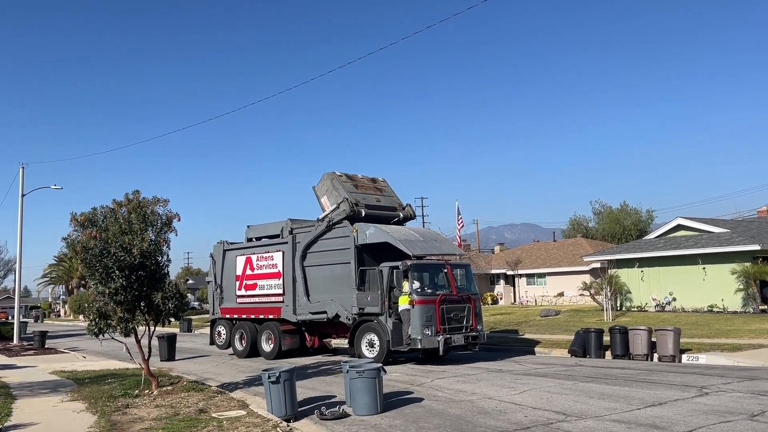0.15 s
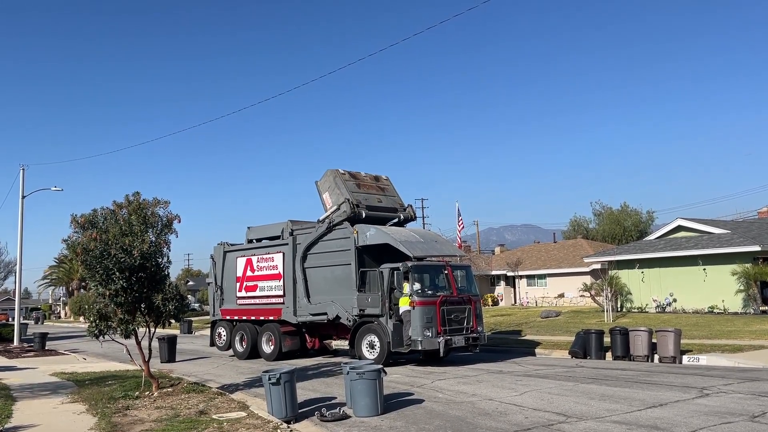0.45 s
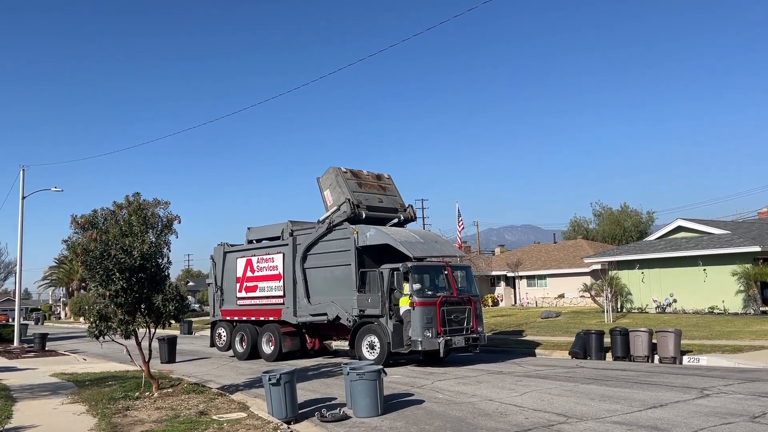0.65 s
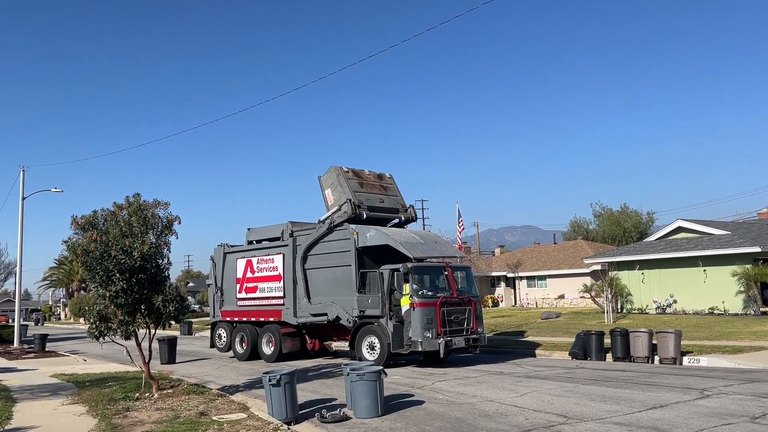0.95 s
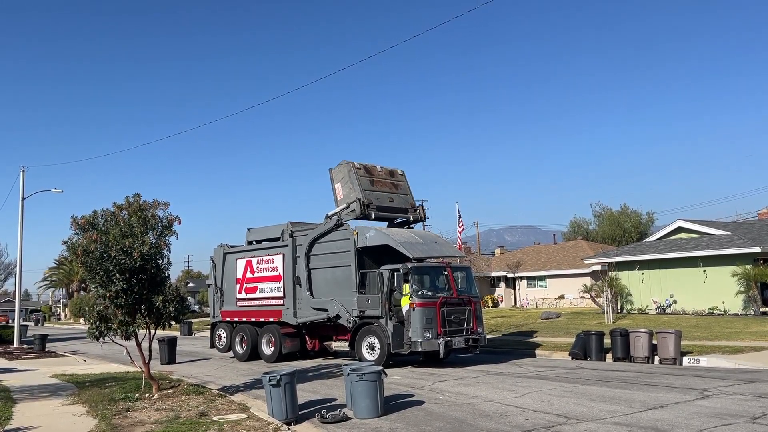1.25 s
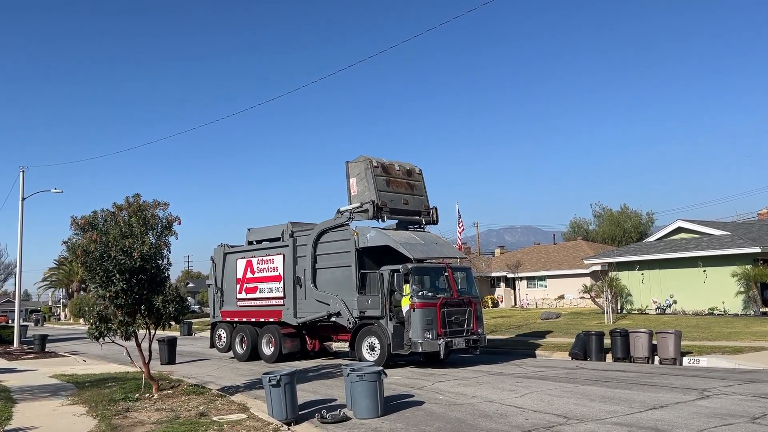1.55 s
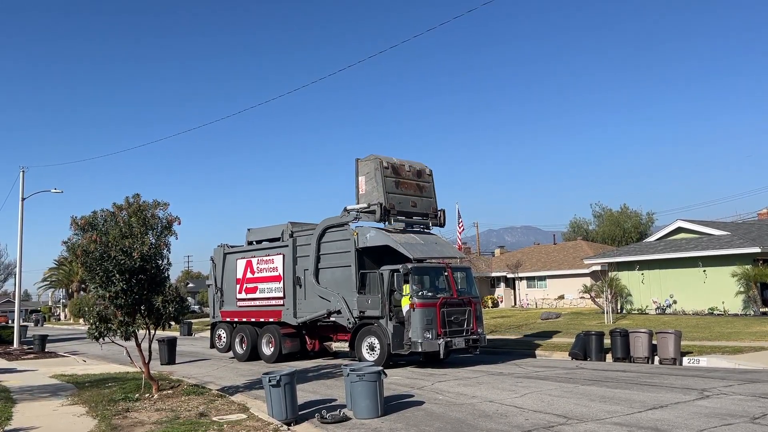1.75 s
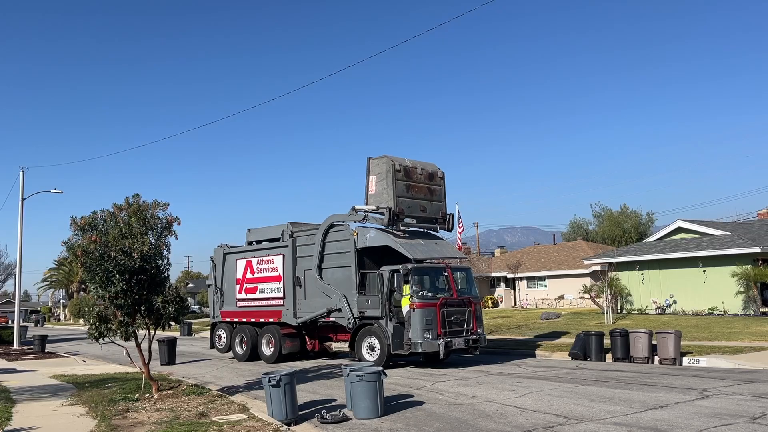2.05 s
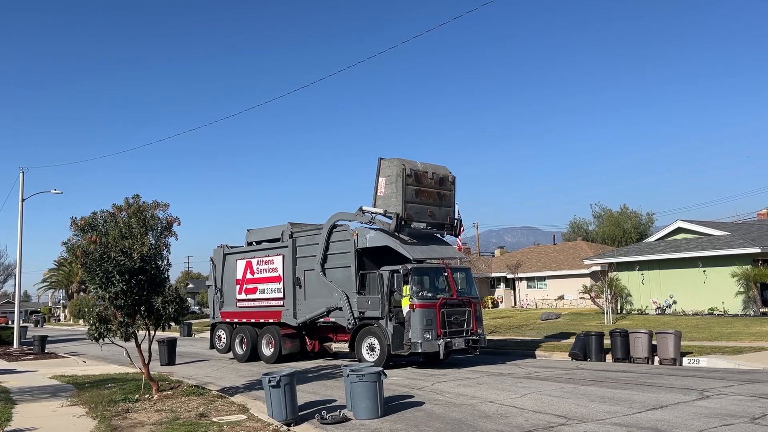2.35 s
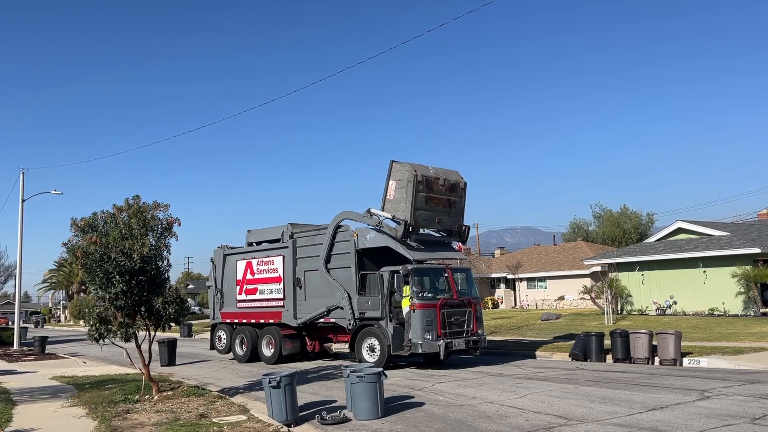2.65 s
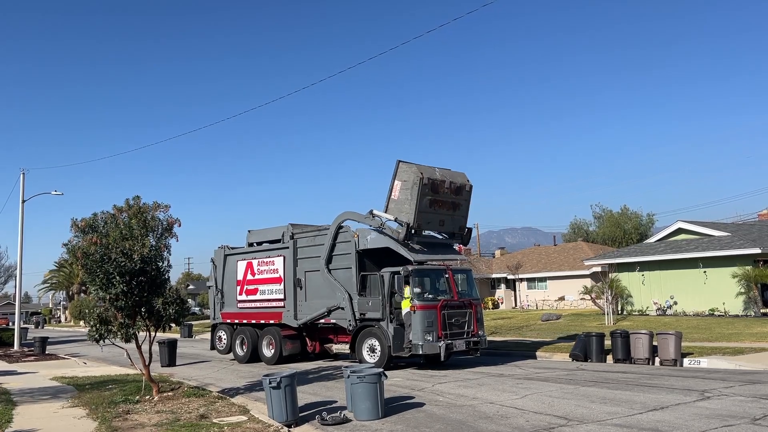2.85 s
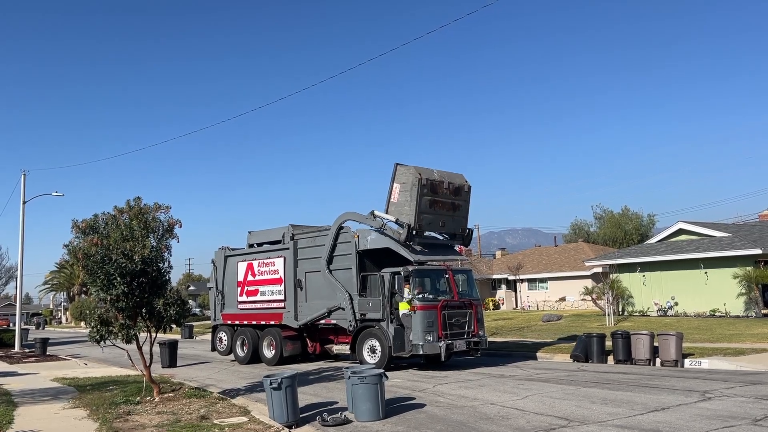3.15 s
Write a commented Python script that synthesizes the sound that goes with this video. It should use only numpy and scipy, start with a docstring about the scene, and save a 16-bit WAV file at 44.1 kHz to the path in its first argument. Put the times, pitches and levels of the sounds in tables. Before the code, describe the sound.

A garbage truck's diesel engine revs with hydraulic whine, then a steel bin bangs loudly.

```python
"""Refuse truck tipping a bin

Across a street, a six-cylinder diesel revs to swing a steel bin over the cab. The exhaust drones, block
and fan roar, gears and hydraulic pump whine with the engine speed, and oil hisses in the valves.
The arms click, the bin rocks, then it slams about on the forks in booming, ringing sheet-steel blows."""
import sys
import numpy as np
from scipy import signal
from scipy.fft import rfft, irfft
from scipy.io import wavfile

SR = 44100
rng = np.random.default_rng(int(sys.argv[2]) if len(sys.argv) > 2 else 0)


def wrap_up_sound(samples):
    """Save the sound to the file named by the first command line argument, as 16-bit audio."""
    columns = np.atleast_2d(samples).T
    # keep every value between -1 and 1, then stretch to whole-number steps
    tamed = np.clip(columns, -1, 1)
    steps = np.round(tamed * 32767).astype(np.int16)
    wavfile.write(sys.argv[1], SR, steps)


N = 145530
T = np.arange(N) / SR
CYLINDERS = 6


def amp(db):
    """Decibels to gain."""
    return 10 ** (np.asarray(db) / 20)


def unit(x):
    """Scales to rms 1."""
    return x / np.sqrt(np.mean(x ** 2) + 1e-20)


def curve(points):
    """Draws an automation curve through the scene."""
    return np.interp(T, *np.transpose(points))


def at_hz(points, hz):
    """Reads a table over log frequency."""
    f, value = np.transpose(points)
    return np.interp(np.log(hz + 1), np.log(f + 1), value)


def equalise(x, eq):
    """Filters by an EQ curve in dB."""
    size = x.shape[-1]
    return irfft(rfft(x) * amp(at_hz(eq, np.fft.rfftfreq(size, 1 / SR))), size)


def wander(hz):
    """Random drift of rms 1, rolling off above the given rate."""
    rolloff = 1 + (np.fft.rfftfreq(N, 1 / SR) / hz) ** 4
    return unit(irfft(rfft(rng.standard_normal(N)) / rolloff, N))


def add(mix, start_s, sound):
    """Drops a sound into the mix."""
    part = mix[:, round(start_s * SR):][:, :sound.shape[-1]]
    part += sound[..., :part.shape[-1]]


def decay(t, t60):
    """A tail that falls 60 dB in t60 seconds."""
    return np.exp(-np.log(1000) * t / t60)


def attack(rise_s):
    """A linear fade-in for a one-second hit."""
    return np.minimum(T[:SR] / rise_s, 1)


# Stereo width of the noise. Each row: frequency in Hz, left-right correlation.
LIKENESS = [(100, .9996), (200, .99), (350, .94), (650, .76), (1200, .85), (3000, .8), (8000, .9)]

def noise(size, eq, pulse=1):
    """Coloured noise of rms 1, partly alike at the two microphones."""
    a, b = rfft(rng.standard_normal((2, size)))
    likeness = at_hz(LIKENESS, np.fft.rfftfreq(size, 1 / SR))
    mid, side = a * np.sqrt(1 + likeness), b * np.sqrt(1 - likeness)
    white = irfft(np.array([mid + side, mid - side]), size)
    return unit(equalise(white * pulse, eq))


def burst(eq, t60, rise_s):
    """A knock that dies evenly at all pitches."""
    return noise(SR, eq) * decay(T[:SR], t60) * attack(rise_s)


# Faders for the exhaust's drone and lope. Each row: time in seconds, level in dB.
DRONE_FADER = [(0, -28.5), (.13, -20.5), (.22, -22), (.25, -33), (.34, -30.5), (.41, -21), (.45, -36),
               (.75, -52), (1.06, -31.5), (1.15, -29), (1.4, -24), (1.62, -18.5), (1.655, -39), (1.74, -29),
               (1.85, -23.5), (2.17, -20), (2.23, -29), (2.26, -19.5), (2.4, -24.5), (2.76, -21.5),
               (3.3, -29)]
LOPE_FADER = [(0, -25.5), (.38, -30), (.5, -29), (.9, -25.5), (1.05, -32), (1.2, -25), (1.6, -27.5),
              (1.7, -35), (2.15, -30), (2.25, -29.5), (2.35, -30), (3.3, -35)]
# The lope's partials. Each row: multiple of the six-firing cycle, relative level in dB.
LOPE_PARTIALS = [(3, 3.5), (4, 0), (5, 1), (7, -7), (8, -6.5), (9, -4), (10, -7), (12, -9.5), (14, -10),
                 (16, -14.5), (18, -11)]

def exhaust(firings):
    """A drone at the firing rate, with unequal cylinders loping around it."""
    cycle = 2 * np.pi * firings / CYLINDERS
    lope = sum(amp(db) * np.cos(order * cycle + 1.45 * wander(hz=7.6)) for order, db in LOPE_PARTIALS)
    drone = np.sqrt(2) * np.sin(2 * np.pi * firings)
    return amp(curve(DRONE_FADER)) * drone + amp(curve(LOPE_FADER)) * unit(lope)


# Fader for block and fan. Each row: time in seconds, level in dB.
ROAR_FADER = [(0, -36.5), (.24, -31.5), (.55, -33), (.76, -27.5), (.95, -28.5), (1.13, -31), (1.35, -33.5),
              (1.65, -36), (2.1, -34.5), (2.45, -37), (2.76, -34), (3.3, -29.5)]
# Their dark tone. Each row: frequency in Hz, relative level in dB.
ROAR_EQ = [(20, -13.5), (45, -2), (90, -6.5), (160, -0.5), (260, 1), (420, -3), (650, -4.5), (1000, -9.5),
           (1500, -10.5), (2100, -15), (2800, -20), (4500, -24), (6000, -34.5), (8000, -39), (10000, -56),
           (13000, -43), (15500, -70)]

def engine_roar(firings):
    """Block and fan noise, pulsed by a knock of random strength at every firing."""
    depth, length_firings, scatter_db = 0.15, 0.22, 6.5
    strength = amp(scatter_db * rng.standard_normal(N))[firings.astype(int)]
    knock = unit(strength * np.exp(-(firings % 1) / length_firings))
    return amp(curve(ROAR_FADER)) * noise(N, ROAR_EQ, pulse=1 - depth + depth * knock)


# Fader for the gears. Each row: time in seconds, level in dB.
WHINE_FADER = [(0, -41.5), (.17, -39.5), (.22, -46), (.4, -44), (.55, -40), (.63, -43), (.71, -35),
               (.76, -34.5), (.8, -43), (.86, -39.5), (.99, -44), (1.04, -33), (1.07, -37.5), (1.09, -50),
               (1.13, -47), (1.155, -34.5), (1.22, -37.5), (1.27, -48), (1.37, -40.5), (1.6, -41.5),
               (1.95, -40.5), (2.4, -43.5), (2.76, -39)]

def gear_whine(firings, firing_hz):
    """A rasping mesh tone that throbs and wobbles more as the engine lugs at low speed."""
    teeth_per_firing, lug_hz, throb_limit_db = 16, 87, 4.5
    cycle = 2 * np.pi * firings / CYLINDERS
    lug = (lug_hz / firing_hz) ** 5.4
    throb = lug * (-2 * np.sin(cycle) + 1.5 * np.sin(4 * cycle) + 4.5 * wander(hz=39))
    throb_db = throb_limit_db * np.tanh(throb / throb_limit_db)
    wobble = 0.68 * lug * wander(hz=53)
    mesh = np.sin(2 * np.pi * teeth_per_firing * firings + wobble)
    rasp = 1 + 0.45 * wander(hz=100)
    return amp(curve(WHINE_FADER)) * unit(amp(throb_db) * mesh * rasp)


# The pump's tones. Each row: multiple of the firing rate, level in dB before pipework and swell.
PUMP_TONES = [(7.68, -46.5), (23.7, -54), (31.1, -54), (38.5, -55.5), (39.8, -57.5)]
# The pipework favours some pitches. Each row: frequency in Hz, gain in dB.
PIPE_EQ = [(650, -6), (880, 5), (1750, -3.5), (1920, 3), (2200, -4), (2340, 4.5), (2430, 2), (2500, -7),
           (2850, -5), (2970, -1.5), (3100, -6), (3250, 3), (3380, -6), (3570, 1), (3750, -9), (4150, -6),
           (4420, 1)]

def hydraulic_pump(firings):
    """Fuzzy, flickering tones that track the engine's speed and swell with its roar."""
    fuzz_hz, flicker_db = 30, 1.5
    tones = 0
    for multiple, db in PUMP_TONES:
        phase = 2 * np.pi * multiple * firings
        fuzzy = wander(fuzz_hz) * np.cos(phase) + wander(fuzz_hz) * np.sin(phase)
        tones += amp(db) * unit(fuzzy * amp(flicker_db * wander(hz=4.2)))
    effort_db = curve(ROAR_FADER)
    swell = amp(0.3 * (effort_db - effort_db.mean()))
    return equalise(tones, PIPE_EQ) * swell


# Fader for the oil. Each row: time in seconds, level in dB.
HISS_FADER = [(0, -65.5), (.58, -61), (.72, -45.5), (.9, -74), (1.05, -55.5), (1.3, -69), (3.3, -65)]
# Its thin, bright tone. Each row: frequency in Hz, relative level in dB.
HISS_EQ = [(20, -64.5), (2000, -17.5), (4500, 6), (7500, -3), (10000, -13.5), (13000, -28), (15500, -23.5)]

def valve_hiss():
    """Oil rushing through the valves."""
    return amp(curve(HISS_FADER)) * noise(N, HISS_EQ)


# Cues for the arm joints. Each row: start in seconds, level in dB, t60 in seconds.
CLICK_CUES = [(0.147, -34.5, 0.04), (0.948, -30.5, 0.025), (0.961, -31.5, 0.05), (2.624, -35.5, 0.03),
              (2.760, -24, 0.07)]
# Their midrange snap. Each row: frequency in Hz, relative level in dB.
CLICK_EQ = [(20, -38), (400, 10.5), (1500, 7.5), (4500, 0.5), (8000, -9), (13000, -25), (15500, -24)]

def linkage_clicks():
    """Light clicks as the arm joints take up their slack."""
    out = np.zeros((2, N))
    for start, db, t60 in CLICK_CUES:
        add(out, start, amp(db) * burst(CLICK_EQ, t60, rise_s=0.0015))
    return out


# Cue for the rocking bin. Each row: start in seconds, level in dB.
CLUNK_CUES = [(1.113, -25.5)]
# Its hollow tone. Each row: frequency in Hz, relative level in dB.
CLUNK_EQ = [(20, -30), (300, -8), (600, 0), (760, 14), (950, 1), (1130, 4), (1450, -8), (2500, -30),
            (15500, -64)]

def bin_clunk():
    """A dull clunk as the bin rocks on the forks before it tips."""
    out = np.zeros((2, N))
    for start, db in CLUNK_CUES:
        add(out, start, amp(db) * burst(CLUNK_EQ, t60=0.16, rise_s=0.008))
    return out


def steel_ring(modes, rise_s):
    """Steel ringing after a blow; the high modes reach the two microphones out of step."""
    t, out = T[:SR], 0
    for hz, db, t60 in modes:
        spread = 0.35 * min(hz / 1000, 1) ** 2
        phase = 2 * np.pi * rng.random() + spread * rng.standard_normal((2, 1))
        out += amp(db) * decay(t, t60) * np.sin(2 * np.pi * hz * t + phase)
    return out * attack(rise_s)


def sheet_steel(eq, tails, rise_s):
    """Countless close modes of a struck panel, the lows outlasting the highs."""
    hz, t, spectrum = signal.stft(noise(SR, eq), SR, nperseg=512)
    _, wash = signal.istft(spectrum * decay(t, at_hz(tails, hz)[:, None]), SR)
    return wash[:, :SR] * attack(rise_s)


# The bin's ringing notes. Each row: frequency in Hz, relative level in dB, t60 in seconds.
BIN_MODES = [(104, 6.5, .6), (210, -9, .8), (236, -5, 1), (258, -8, .9), (304, -8, .8), (390, -6, .8),
             (419, -9, .9), (449, -10, .8), (606, -12, .7), (700, -11, .35), (732, -12, .7), (813, -9, .35),
             (860, -13, .7), (974, -8, .5), (1071, -5.5, .9), (1220, -15, .3), (1335, -13, .3),
             (1457, -12, .42), (1787, -13, .5)]

def bin_ring(pitch_hz, rise_s):
    """The place of a blow decides which modes ring most: those near pitch_hz are lifted."""
    lift_db, width_octaves = 12, 0.2
    modes = []
    for hz, db, t60 in BIN_MODES:
        nearness = np.exp(-(np.log2(hz / pitch_hz) / width_octaves) ** 2)
        modes.append((hz, db + lift_db * nearness, t60))
    return steel_ring(modes, rise_s)


# The forks' clank. Each row: frequency in Hz, relative level in dB, t60 in seconds.
FORK_MODES = [(1920, 1, .3), (2008, 0, .35), (2121, -1, .25), (2315, -2, .3), (2815, -7, .3),
              (3284, -7, .25), (3564, -3, .25), (3666, 1, .14), (4177, -4, .22), (5141, -6, .16)]
# Tone of each noise layer in a blow. Each row: frequency in Hz, relative level in dB.
CRACK_EQ = [(20, -28.5), (500, 14.5), (2000, 10), (3000, 3), (4400, 9.5), (6000, 0), (8000, -7),
            (10000, -30.5), (13000, -30), (15500, -31)]
CRASH_EQ = [(20, -40), (300, -10), (900, 4), (1400, -1), (2100, -4), (2900, -10.5), (4400, -15),
            (6000, -22), (8000, -24), (10000, -57), (13000, -43), (15500, -47)]
BOOM_EQ = [(20, -34), (70, -12), (160, -6), (280, -4.5), (430, -1), (570, -14), (950, -11), (1300, -24),
           (2500, -43), (15500, -85)]
THUD_EQ = [(20, -23), (38, -3), (58, -1), (105, 0), (150, -8), (300, -40), (15500, -100)]
# Tails of the sheet steel. Each row: frequency in Hz, t60 in seconds.
CRASH_TAILS = [(300, 0.88), (1000, 0.23), (2200, 0.18), (5000, 0.24), (13000, 0.17)]
BOOM_TAILS = [(100, 0.8), (300, 0.85), (1000, 0.6), (3000, 0.16)]
# Cues for the blows. Each row: start in seconds, crack level in dB, its tilt above 1 kHz in dB per
# octave, levels of clank, crash, boom, thud and ring in dB, favoured ring pitch in Hz.
BLOW_CUES = [(2.779, -13.5, 5.5, -28.5, -17.5, -19, -13, -22.5, 970),
             (2.801, -25.5, 7, -40, -16.5, -18.5, -12.5, -26.5, 420),
             (2.820, -31, -7, -36, -26, -22.5, -19, -29.5, 1400),
             (2.838, -28.5, 6.5, -40, -23.5, -19.5, -23.5, -27, 240),
             (2.867, -21, 0, -39.5, -19, -18, -16.5, -36.5, 1000),
             (2.886, -11, -1.5, -28, -19, -24.5, -25.5, -24.5, 720),
             (2.914, -30.5, -4, -36.5, -22.5, -22.5, -13.5, -25, 1200),
             (2.945, -21.5, 0, -34.5, -17, -19, -24, -24, 1071),
             (2.989, -28.5, 3, -37.5, -21, -15, -10.5, -24, 290),
             (3.084, -25.5, 11.5, -33, -17.5, -19, -16.5, -26, 1457),
             (3.098, -25.5, 4.5, -34.5, -13, -19.5, -24, -30.5, 1300),
             (3.139, -37, -1, -41.5, -17, -16.5, -17.5, -22, 830),
             (3.166, -25, 0.5, -45.5, -28.5, -20, -24, -30.5, 430),
             (3.199, -46, 0, -53, -32, -16.5, -28, -25.5, 390),
             (3.232, -50, 0, -56, -42, -23.5, -33, -29.5, 239)]

def bin_slams():
    """Steel cracks on steel, the forks clank, the bin crashes, booms and rings, and the truck thuds."""
    out = np.zeros((2, N))
    for start, crack_db, tilt, clank_db, crash_db, boom_db, thud_db, ring_db, pitch_hz in BLOW_CUES:
        crack_eq = [(hz, db + tilt * np.log2(max(hz / 1000, 1))) for hz, db in CRACK_EQ]
        add(out, start, amp(crack_db) * burst(crack_eq, t60=0.065, rise_s=0.003))
        add(out, start, amp(clank_db) * steel_ring(FORK_MODES, rise_s=0.003))
        add(out, start, amp(crash_db) * sheet_steel(CRASH_EQ, CRASH_TAILS, rise_s=0.002))
        add(out, start, amp(boom_db) * sheet_steel(BOOM_EQ, BOOM_TAILS, rise_s=0.008))
        add(out, start, amp(thud_db) * burst(THUD_EQ, t60=0.78, rise_s=0.008))
        add(out, start, amp(ring_db) * bin_ring(pitch_hz, rise_s=0.008))
    return out


# The engine revs up and settles. Each row: time in seconds, firing rate in Hz.
ENGINE_REVS = [(0, 77.6), (.2, 86.97), (.42, 93.4), (.6, 103.8), (.75, 111), (.88, 115.6), (1.03, 108.9),
               (1.2, 96.8), (1.4, 83.2), (1.62, 78.45), (1.9, 81.4), (2.12, 83.26), (2.3, 78.87),
               (2.44, 75.2), (2.6, 76.5), (2.78, 81.6), (3.3, 79.65)]

def scene():
    """One engine speed drives every running part; the bin clatters on top."""
    firing_hz = curve(ENGINE_REVS)
    firings = np.cumsum(firing_hz) / SR
    engine = exhaust(firings) + engine_roar(firings) + gear_whine(firings, firing_hz)
    hydraulics = hydraulic_pump(firings) + valve_hiss()
    return engine + hydraulics + linkage_clicks() + bin_clunk() + bin_slams()


# Stereo balance. Each row: frequency in Hz, left minus right in dB.
BALANCE = [(300, -0.7), (540, 0.5), (940, 8.5), (1640, 6), (2850, -1.2), (4940, -3.5), (8570, 3)]
# Stereo phase. Each row: frequency in Hz, lead of the left side in radians.
LEFT_LEAD = [(500, 0), (1200, .1), (1900, .25), (2300, .6), (2580, 1.8), (3100, 2.1), (4250, 1.7),
             (4600, 2.4), (5150, .7), (5750, 2.8), (6500, 3.5), (7200, 6.0), (8700, 6.4)]

def record(dry):
    """Two microphones differ in level and phase; rumble is cut, peaks are rounded, the top is trimmed."""
    mono_hz, rumble_hz, top_hz = 220, 48.5, 14500
    hz = np.fft.rfftfreq(2 * N, 1 / SR)
    apart = 1 - np.exp(-(hz / mono_hz) ** 4)  # keeps the bass centred
    left = amp(apart * at_hz(BALANCE, hz) / 2) * np.exp(0.5j * apart * at_hz(LEFT_LEAD, hz))
    pair = irfft(rfft(dry, 2 * N) * np.array([left, 1 / left]))[:, :N]
    pair = signal.sosfilt(signal.butter(4, rumble_hz, "high", fs=SR, output="sos"), pair)
    rounded = pair / (1 + pair ** 8) ** (1 / 8)
    lowpass = signal.firwin(511, top_hz, window=("kaiser", 9), fs=SR)
    return signal.oaconvolve(rounded, lowpass[None], "same")


dry = scene()
out = record(dry)
wrap_up_sound(out)
```